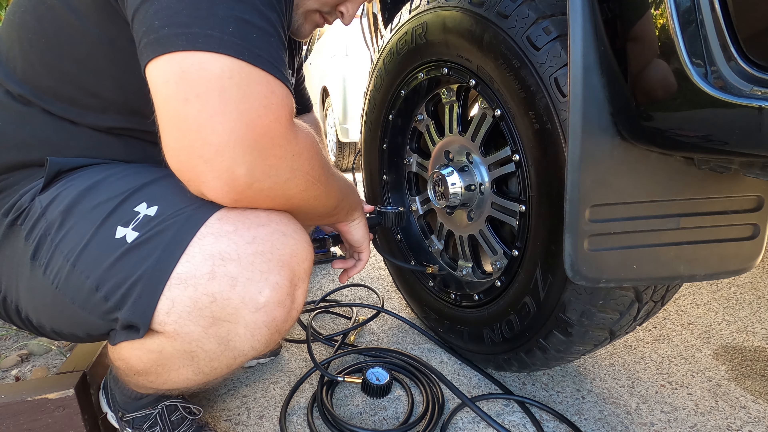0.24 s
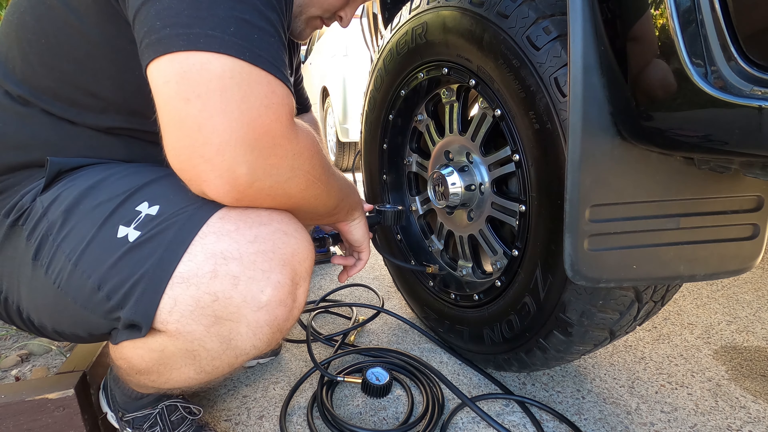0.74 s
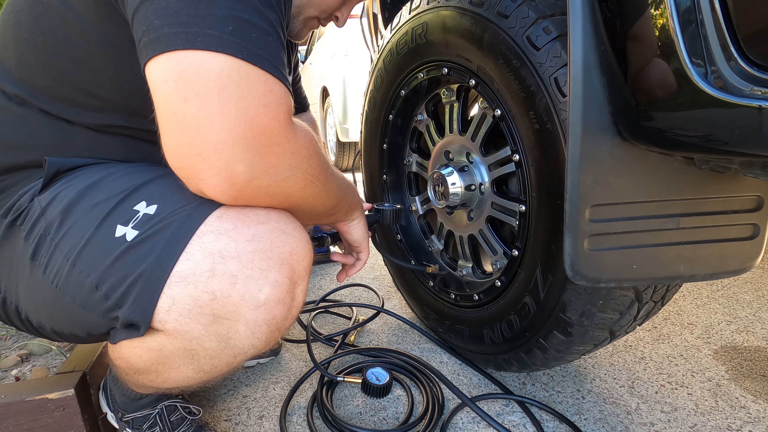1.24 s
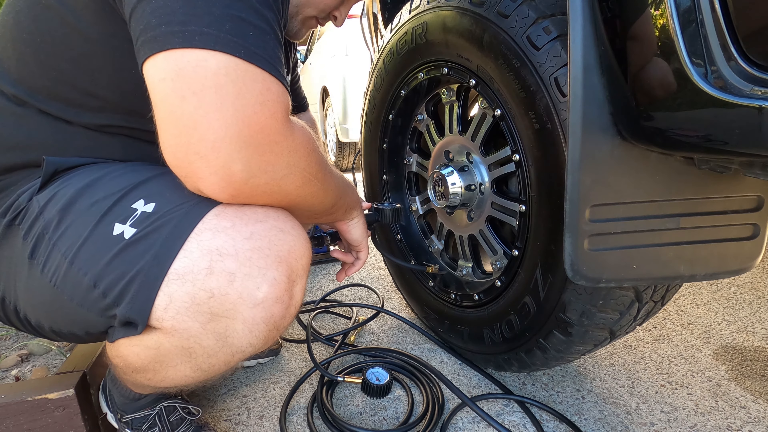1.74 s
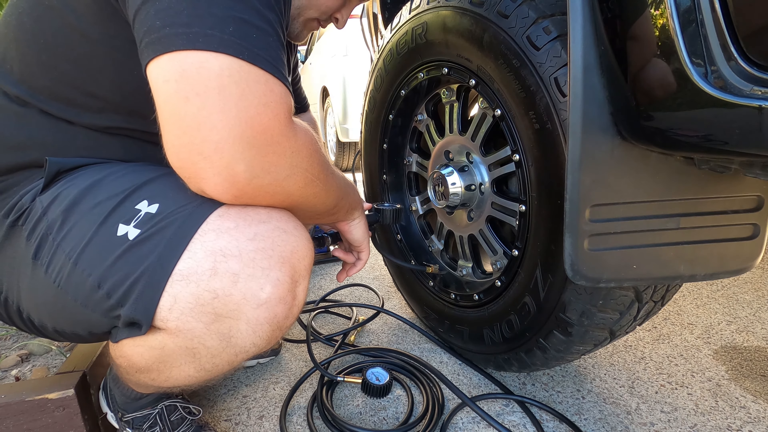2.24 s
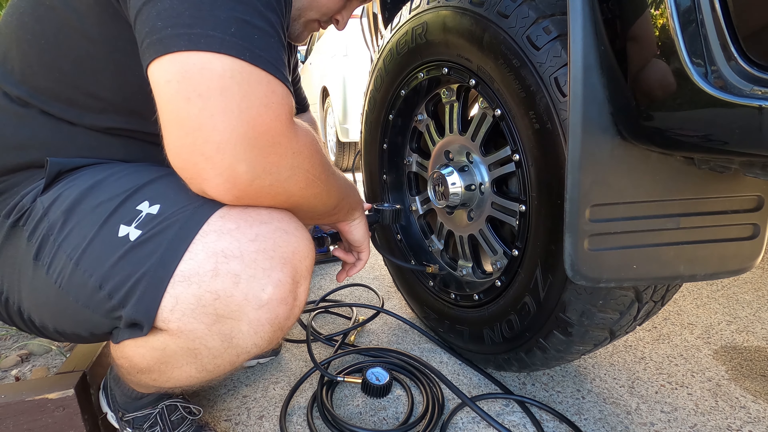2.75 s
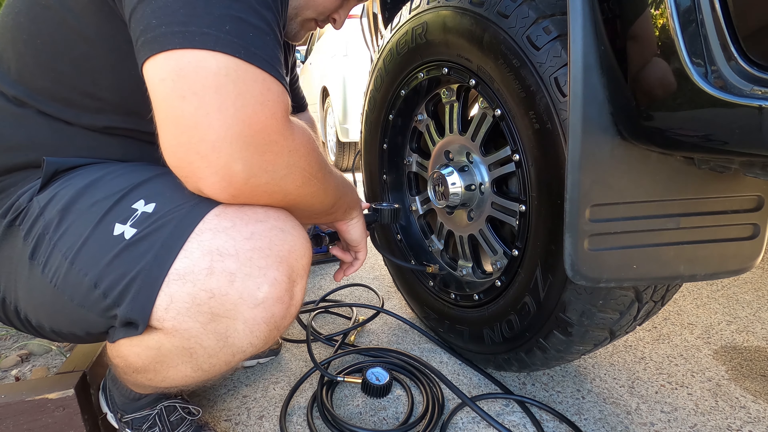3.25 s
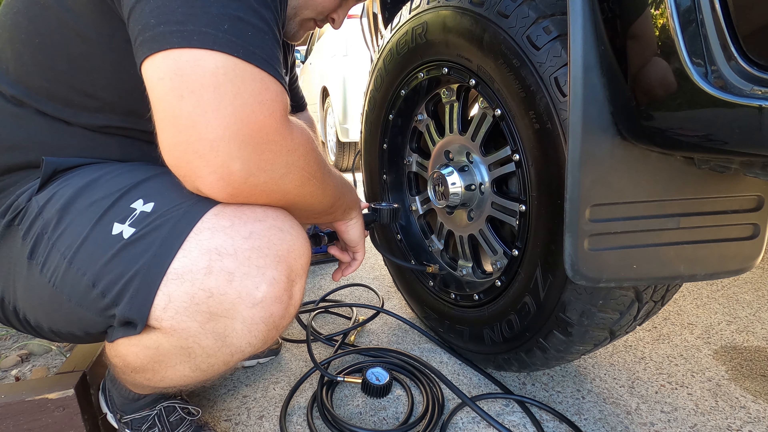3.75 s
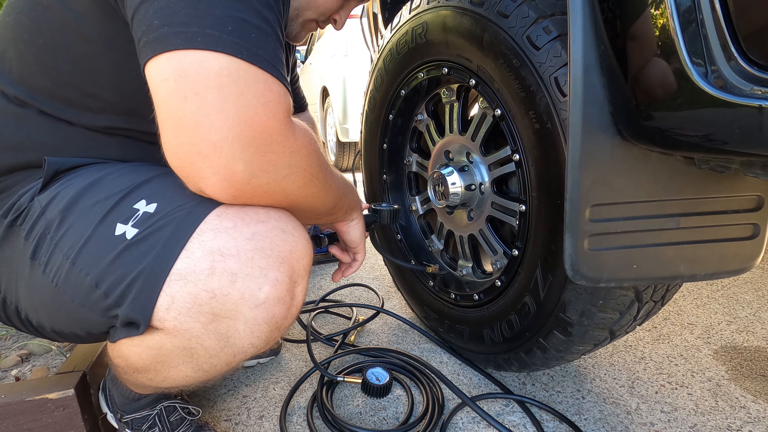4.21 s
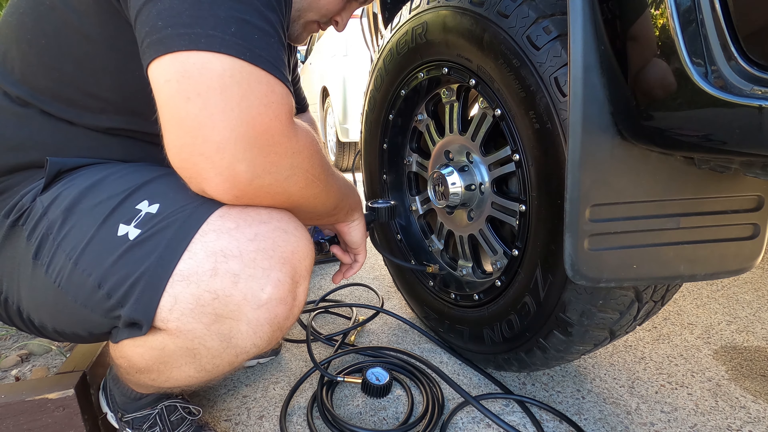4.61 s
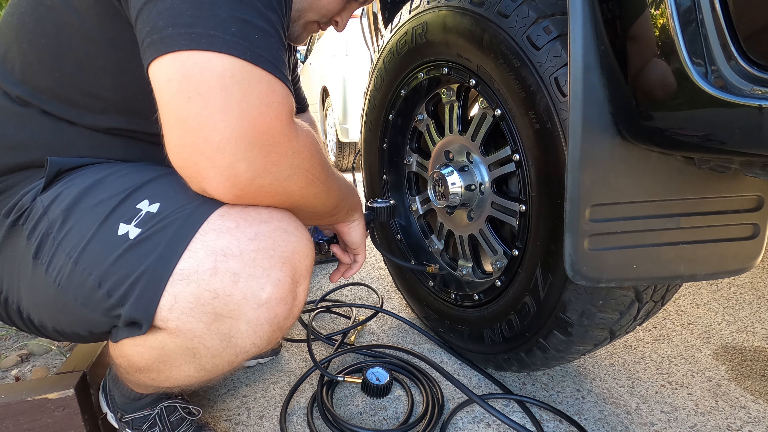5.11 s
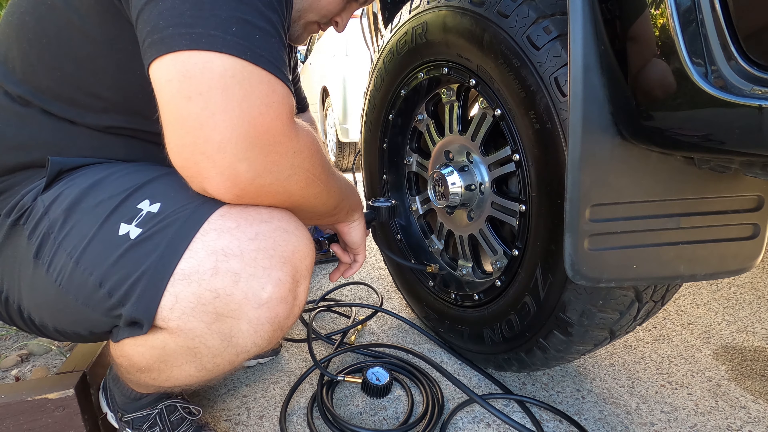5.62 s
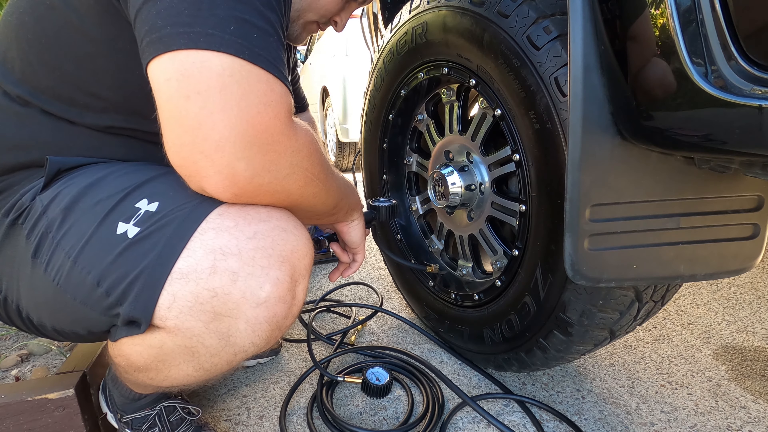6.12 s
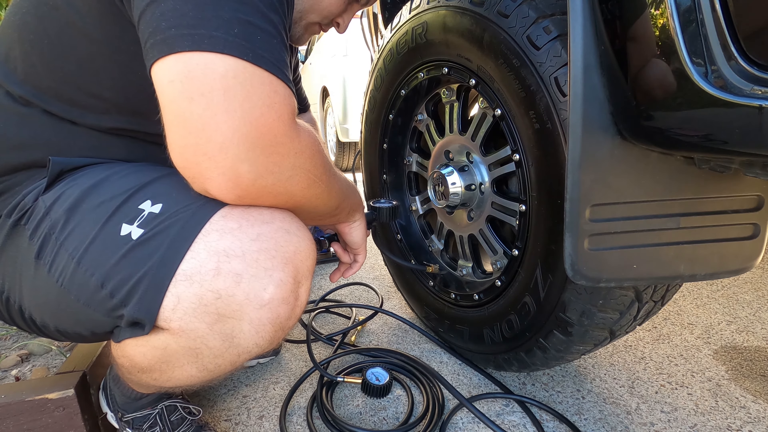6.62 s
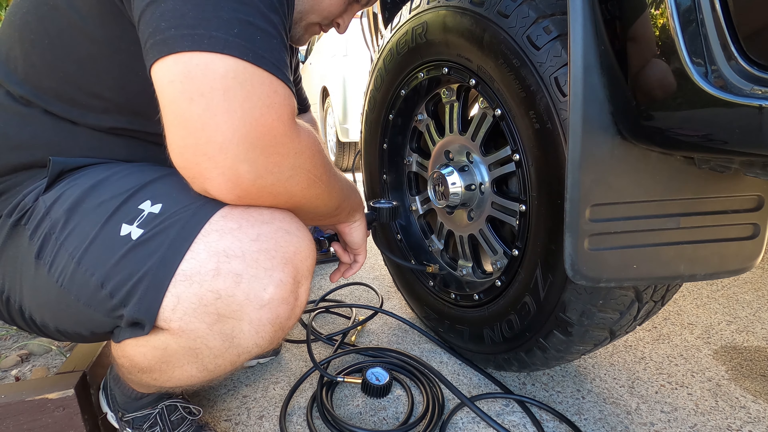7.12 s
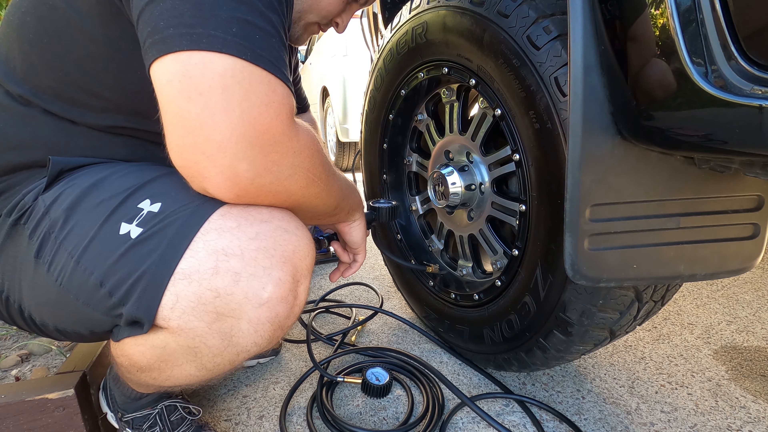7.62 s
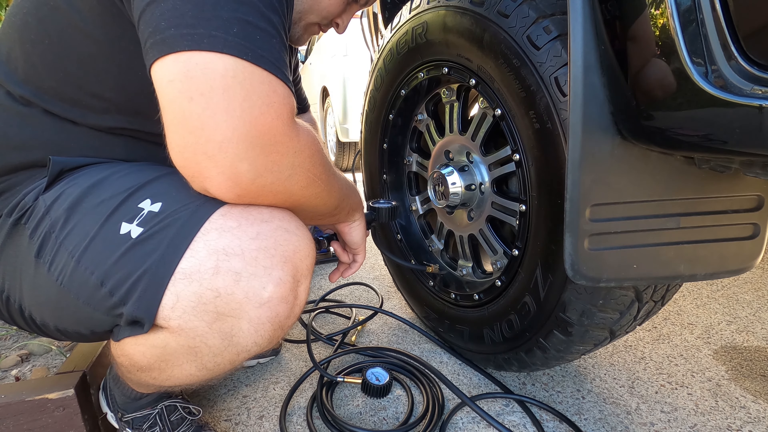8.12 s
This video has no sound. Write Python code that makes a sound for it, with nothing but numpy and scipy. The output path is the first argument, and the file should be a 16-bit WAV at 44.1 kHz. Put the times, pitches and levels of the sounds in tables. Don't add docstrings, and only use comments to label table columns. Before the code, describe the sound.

Outdoors, close to the microphone, a small piston compressor inflates a tyre with a hard, buzzing, rapid hammering and pulsing air hiss. After over four seconds a valve releases with a puff and the motor races higher. It switches off, sputtering briefly, exposing a chugging single-cylinder generator, then restarts with a stuttering burst into the same drone.

```python
import sys
import numpy as np
from scipy import signal
from scipy.fft import rfft, irfft, next_fast_len
from scipy.io import wavfile
from scipy.ndimage import uniform_filter1d

SR = 44100
rng = np.random.default_rng(int(sys.argv[2]) if len(sys.argv) > 2 else 0)


def boost(x):
    u = np.asarray(x, float) / 20
    return 10 ** u


def generate_wav(sig):
    pcm = np.round(np.clip(np.atleast_2d(sig).T, -1, 1) * 32767).astype(np.int16)
    wavfile.write(sys.argv[1], SR, pcm)


N = 368662
TIME = np.arange(N) / SR

RELEASE_S, OFF_S, ON_S = 4.475, 5.655, 6.5
WORK_HZ = 53.0
RACE_HZ, RACE_S = 13.0, 1.0


def after(s):
    return np.clip(TIME - s, 0, None)


def turns(hz, zero_s):
    total = np.cumsum(hz) / SR
    return total - np.interp(zero_s, TIME, total)


def walk(rate):
    hold = int(SR / rate)
    levels = np.repeat(rng.standard_normal(N // hold + 1), hold)
    return 1.213 * uniform_filter1d(uniform_filter1d(levels, hold), hold)[:N]


def band(lo_hz, hi_hz, spectrum):
    size = next_fast_len(N)
    hz = np.arange(1, size // 2 + 2) * SR / size
    corner_hz, level_db = np.transpose(spectrum)
    gain = boost(np.interp(np.log(hz), np.log(corner_hz), level_db))
    inside = (hz >= lo_hz) & (hz < hi_hz)
    noise = irfft(rfft(rng.standard_normal(size)) * gain * inside, size)[:N]
    return noise / np.sqrt(np.mean(gain ** 2))


def swell(turn, at, depth_db, sharp):
    return boost(depth_db * (np.exp(sharp * (np.cos(2 * np.pi * (turn - at)) - 1)) - 1.0))


def gain_db():
    racing = np.clip(after(RELEASE_S) / .5, 0, 1) * np.exp(-after(ON_S) / 0.28)
    quiet = np.clip(after(OFF_S) / 0.26, 0, 1) * np.exp(-after(ON_S) / 0.11)
    lift_db = 2.5 + 3 * np.minimum(after(OFF_S), ON_S - OFF_S)
    return -26 + 3 * racing + quiet * lift_db


def cooling_fan():
    # (frequency [Hz], level [dB per Hz])
    fan_hiss = [(3000, -32), (6000, -1), (8700, -4), (9400, 0), (10800, -5.5), (12000, -23), (13500, -30),
                (14800, -45)]
    return band(0, SR, fan_hiss)


def windings(turn):
    # (multiple of the firing rate, level [dB], lag [cycles])
    coil_lines = [(1, -37, 0.), (2, -26, -0.12), (3, -24.5, 0.54), (4, -13, -0.0094), (5, -28, -0.088),
                  (8, -14.5, 0.32)]
    hum = 0
    for multiple, db, lag in coil_lines:
        size = np.sqrt(2) * boost(db + 0.26 * walk(11.0))
        hum = hum + size * np.cos(2 * np.pi * (np.round(multiple) * turn - lag))
    return hum


def engine_clatter(turn):
    # (frequency [Hz], level [dB per Hz])
    clatter_tone = [(55, -60), (150, -8), (250, -7), (400, -4.5), (530, -7), (650, -1), (800, -6.5),
                    (2800, -10.5), (3400, -14), (4800, -17), (5700, -25.5), (6900, -24), (8600, -40),
                    (14500, -75)]
    clatter = band(0, 800, clatter_tone) * swell(turn, at=0.4, depth_db=4.0, sharp=0.56)
    clatter += band(800, 1600, clatter_tone) * swell(turn, at=0.27, depth_db=6.0, sharp=1.8)
    return clatter + band(1600, SR, clatter_tone) * swell(turn, at=.19, depth_db=6.0, sharp=1.9)


def exhaust(turn, size_db):
    # (frequency [Hz], width [Hz], level [dB])
    chambers = [(346, 25, -1.5), (479.5, 12.4, 2.5), (601, 32, 2), (705, 27, -4.5), (909, 39, 2),
                (1116, 26, 4.5), (1406, 25, -6), (1560, 47, -7), (2010, 140, -14), (2390, 83, -26),
                (3450, 140, -10)]
    fired = np.diff(np.floor(turn - .15), prepend=np.floor(turn[0] - .15)) * boost(size_db)
    fired = signal.sosfilt(signal.butter(2, 3500, fs=SR, output="sos"), fired)
    fired = fired + 0.025 * swell(turn, at=0.2, depth_db=9.5, sharp=2.7) * rng.standard_normal(N)
    late = (np.linspace(.012, 0, len(chambers)) * SR).astype(int)
    pipe = np.zeros(N)
    for delay, (hz, width_hz, db) in zip(late, chambers):
        ring = signal.lfilter(*signal.iirpeak(hz, hz / width_hz, fs=SR), fired)
        pipe += boost(db) * np.roll(ring, delay)
    return pipe / np.std(pipe)


def generator():
    # (time [s], rate [Hz])
    firing_rate = [(0, 24.95), (1, 24.945), (2, 24.985), (4.5, 24.985), (5, 24.98), (5.6, 25.0),
                   (5.85, 25.09), (6.5, 25.11), (6.7, 24.82), (7.5, 24.89), (8.36, 24.99)]
    turn = turns(np.interp(TIME, *np.transpose(firing_rate)), 6.16)
    count = np.floor(turn - turn[0]).astype(int)
    puff_db, clatter_db = 1.1 * rng.standard_normal((count[-1] + 1, 2))[count].T
    strength = boost(uniform_filter1d(clatter_db, size=300))
    db = gain_db()
    mix = boost(-7.0) * exhaust(turn, puff_db) + boost(-3.5) * strength * engine_clatter(turn)
    mix += boost(-.25 * (db + 24.5)) * windings(turn) + boost(-32.5) * cooling_fan()
    return boost(db) * mix


def controls():
    second = TIME >= ON_S
    hz = WORK_HZ - .017 * np.minimum(TIME, RELEASE_S) + RACE_HZ * (1 - np.exp(-after(RELEASE_S) / RACE_S))
    hz = np.maximum(hz - 260 * after(OFF_S), 22)
    stall = np.exp(-(after(ON_S) / .072) ** 1.3)
    hz = np.where(second, 52.77 - 1.85 * np.exp(-after(ON_S) / .43) - 25.9 * stall, hz)
    coast_db = np.maximum(-8 * (after(OFF_S) / 0.14) ** 8, -80)
    hum_db = np.where(second, -38 * np.exp(-after(ON_S) / 0.011) - 8 * stall, coast_db)
    race = 1 - np.exp(-(after(RELEASE_S) * RACE_HZ / RACE_S / 2.8) ** 2)
    eased = np.where(second, 0.51 * stall, race * np.exp(-after(OFF_S) / 0.04))
    gasp_db = 0
    for s, db, rise_s in ((RELEASE_S, 4.5, .055), (ON_S, 3, 0.045)):
        age = after(s) / rise_s
        gasp_db = gasp_db + db * age * np.exp(1 - age)
    return hz, hum_db, -38.5 + 3 * eased + gasp_db + hum_db, np.clip(eased, 0, 1)


def rattle(turn, hz):
    # (multiple of the crank rate, level [dB])
    rattle_tone = [(64.5, -52.5), (72, -52.5), (84, -58), (95, -62), (115, -64.5), (135, -68.5),
                   (160, -75.5), (180, -76.5), (210, -92)]
    multiple = np.arange(65, 211)
    size = boost(np.interp(multiple, *np.transpose(rattle_tone)))
    out, grid = 0, np.arange(4097) / 4096
    for share in (np.cos, np.sin):
        real, imag = rng.standard_normal((2, len(multiple)))
        lines = np.zeros(2049, complex)
        lines[multiple] = size * (real + 1j * imag)
        pattern = irfft(lines) * 2048
        one_turn = np.interp(turn % 1, grid, np.append(pattern, pattern[0]))
        out = out + share(.5 * (hz - 53)) * one_turn
    return out


def valve_air(turn):
    # (frequency [Hz], level [dB per Hz])
    air_tone = [(60, -52), (150, -5.5), (400, -6.5), (700, -12.5), (1050, -4.5), (1500, -13), (2600, -11),
                (3600, -20), (5400, -23.5), (6300, -24.5), (8700, -35.5), (9400, -26), (11500, -38),
                (14500, -62)]
    intake = band(0, 1600, air_tone) * swell(turn, at=-0.45, depth_db=3.0, sharp=1.5)
    hiss = band(1600, 5500, air_tone) * swell(turn, at=-0.42, depth_db=7.0, sharp=3.2)
    puffs = swell(turn, at=-0.35, depth_db=13.5, sharp=1.45)
    puffs += 0.69 * swell(turn, at=.13, depth_db=7.5, sharp=14.)
    return intake + hiss + band(5500, SR, air_tone) * puffs


def housing_gain(hz):
    # (frequency [Hz], width [Hz], level [dB])
    shell_modes = [(110, 28, -36.5), (239.5, 47, -26), (328, 25, -29.5), (398, 35, -23.5), (452, 12, -33),
                   (597, 75, -31.5), (748, 22, -46), (855, 30, -38), (1073, 64, -35.5), (1163, 20, -37),
                   (1560, 62, -38.5), (2090, 143, -34.5), (2670, 120, -38.5), (3230, 400, -48)]
    power = 0
    for mode_hz, width_hz, db in shell_modes:
        power = power + boost(2 * db) / (1 + (2 * (hz - mode_hz) / width_hz) ** 2) ** 1.27
    return np.sqrt(power)


def crank_hum(turn, hz, eased):
    # (multiple of the crank rate, loaded level [dB], drive into the housing when eased [dB],
    # gain below working speed [dB per Hz])
    orders = [(1, -53, -8, 0), (2, -31, 6, 1.5), (3, -39.5, 1, 1.5), (4, -29, 2, 0), (5, -31.5, -6, 1.5),
              (6, -28, 5.5, -3), (7, -40.5, 1, 3), (8, -28.5, 10.5, 6), (9, -30, 2, 3), (10, -23, 7.5, -.5),
              (11, -27.5, 2, .5), (12, -31, 13, 2), (13, -51.5, 6.5, 19), (14, -41.5, 5.5, -11),
              (15, -43.5, 9, -9), (16, -30, 10, -4), (17, -44.5, 16, -3), (18, -28.5, 8, -3),
              (19, -37, 6, 4), (20, -21, 11, 0.5), (21, -31, 2, 3.5), (22, -31.5, 5, -2.5),
              (23, -36, -4, -5), (24, -36.5, 13, -5), (25, -33, 9, -4), (26, -41, 10.5, 1.5),
              (27, -38, 9.5, 2.5), (28, -33, 10.5, -13), (29, -43.5, 11, 8), (30, -52, 12, 18)]
    # (multiple, loaded level [dB], eased drive [dB], gain below working speed [dB per Hz])
    whine = [(32, -40, -5, -21), (33, -47, 8.5, 9), (34, -50.5, 4, 13), (35, -43.5, 1, -17),
             (36, -47, -3, 12), (37, -43, -4, 0), (38, -51.5, -9, 4), (39, -50, -6, -3), (40, -43, 6, 0.5),
             (42, -41.5, -5, 2), (43, -39, 5, 1), (44, -54.5, 2.5, -7), (45, -42.5, -15, -14),
             (47, -48, 1, 4), (48, -42, 7, -18), (50, -40.5, -2, -2), (51, -50, 0, 7.5), (52, -42, 1, -21),
             (53, -45.5, -3, -8), (54, -46.5, 0, -7), (59, -49, 0, 3), (64, -51.5, 0, -4)]
    knocks = [(2, 0.358), (3, -0.16), (5, 0.238), (8, -0.168), (11, -0.0044), (15, 0.3194), (18, 0.471),
              (20, -0.14), (22, -0.2), (27, -0.321), (31, 0.071), (40, -0.342), (46, 0.1), (64, -0.298)]
    multiples = np.arange(1, 65)
    lines, *named_db = np.transpose(orders + whine)
    columns = 2 * rng.standard_normal((len(multiples), 3)).T
    columns[0] += -49.5 - 0.0377 * (multiples - len(orders)) - 8 * (multiples > 54.5)
    columns[:, np.round(lines).astype(int) - 1] = named_db
    loaded_db, drive_db, lagging_db = columns

    up_to, delay = np.transpose(knocks)
    scatter = (0.022 + 0.077 * (multiples > 31.5)) * rng.standard_normal(len(multiples))
    lag = np.cumsum(delay[np.searchsorted(np.round(up_to), multiples)]) + 0.17 + scatter

    shake = .0009 + .002 * eased + .02 * np.clip((WORK_HZ - 1.5 - hz) / 3, 0, 1)
    spin, phasor = np.exp(2j * np.pi * (turn + shake * walk(70))), 1
    step = slice(0, N, 64)
    rate, ease = hz[step], eased[step]
    slow = np.clip(rate / 49.5, 0, 1)
    short = np.clip(WORK_HZ - .1 - rate, 0, 1) * slow ** 8
    bright_hz = np.where(slow < 1, 0, np.maximum(rate, 56) - 60)
    waver = [walk(25)[step] for _ in range(4)]
    hum = np.zeros(N)
    for k, multiple in enumerate(multiples):
        colour_db = np.interp(multiple * slow, multiples, loaded_db)
        tight = boost(colour_db - .5 * multiple * (1 - slow) + lagging_db[k] * short)
        loose = boost(drive_db[k] + 0.0534 * max(multiple - 22, 0) * bright_hz) * housing_gain(multiple * rate)
        size = np.sqrt(2) * (tight + ease * (loose - tight)) * boost(0.42 + (0.09 + 1.0 * ease) * waver[k % 4])
        phasor = phasor * spin
        hum += np.interp(TIME, TIME[step], size) * (phasor * np.exp(-2j * np.pi * lag[k])).real
    return hum


def flutter(events):
    out = np.zeros(N)
    for s, db, hz, swell_s in events:
        age = np.arange(int(2.5 * swell_s * SR)) / SR / swell_s
        shape = np.where(age < 1, np.sin(np.pi / 2 * age) ** 2.0, np.exp(-(age - 1) / 0.23))
        tone = np.sin(2 * np.pi * hz * swell_s * age * (.93 + 0.046 * age))
        start = int(s * SR)
        out[start:start + len(age)] += boost(db) * shape * tone
    return out


def slow_strokes():
    # (time [s], peak level [dB], frequency [Hz], swell [s])
    reed_events = [(5.706, -17, 550, 0.0072), (5.727, -19, 546, 0.0058), (5.747, -12, 505, 0.015),
                   (5.789, -10, 543, 0.013), (5.827, -16, 440, 0.016), (5.847, -19, 476, .01),
                   (6.512, -11.5, 427, .015), (6.532, -8.5, 576, 0.018), (6.561, -11, 500, 0.012),
                   (6.585, -7, 524.7, 0.013), (6.609, -7, 567, 0.0082), (6.631, -7.5, 497, 0.0094)]
    # (time [s], peak level [dB], frequency [Hz], swell [s])
    case_events = [
        (5.692, -15, 1010, 0.014),
        (6.552, -16, 940, 0.012),
        (6.62, -16, 1017, 0.02),
    ]
    return flutter(reed_events) + flutter(case_events)


def pump():
    stroke_tops = [
        2.0225,
        6.6935,
    ]
    hz, hum_db, air_db, eased = controls()
    shaky = hz * (1 + 0.000516 * walk(12))
    turn = np.where(TIME < ON_S, turns(shaky, stroke_tops[0]), turns(shaky, stroke_tops[1]))
    knocking = rattle(turn, hz) * swell(turn, at=-0.34, depth_db=2.0, sharp=1.2)
    hum = crank_hum(turn, hz, eased) + knocking
    air = boost(air_db + 8.5 + 0.42 * walk(30)) * valve_air(turn)
    return boost(hum_db) * hum + air + slow_strokes()


def scene():
    return (generator() + pump())[None]


def band_limit(x):
    return signal.sosfilt(signal.butter(12, 14880, fs=SR, output="sos"), x)


def record(dry):
    return band_limit(np.tanh(0.59 * dry) / 0.62)


dry = scene()
out = record(dry)
generate_wav(out)
```